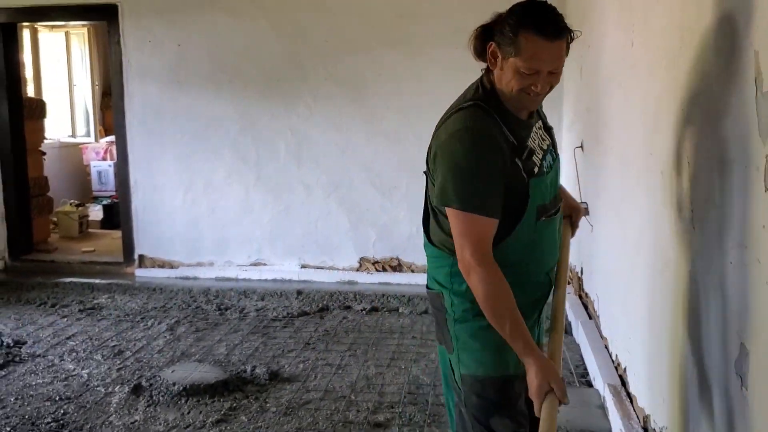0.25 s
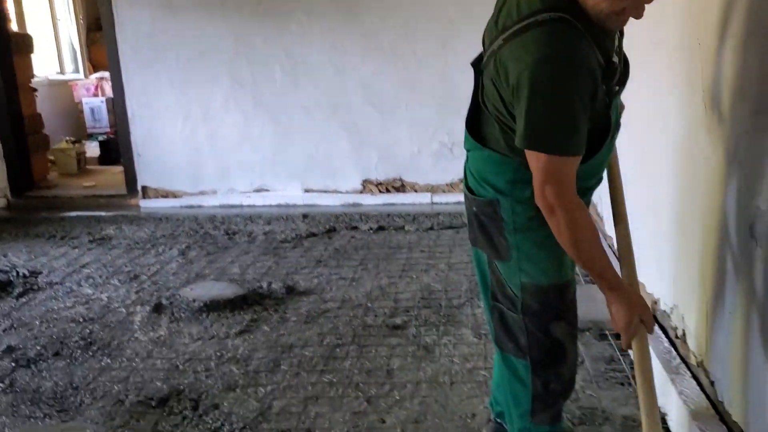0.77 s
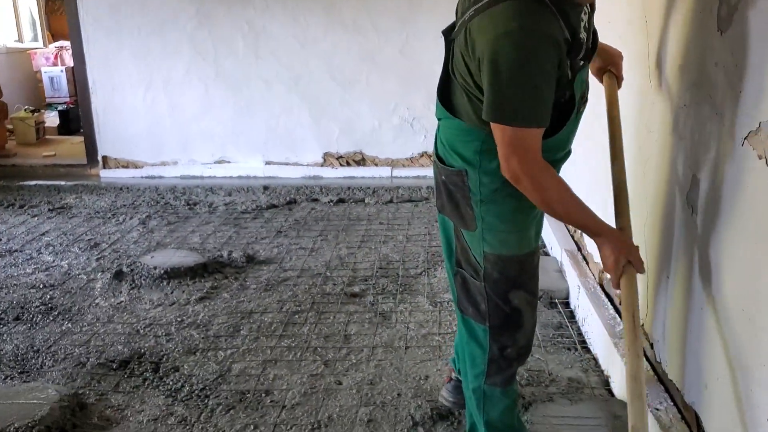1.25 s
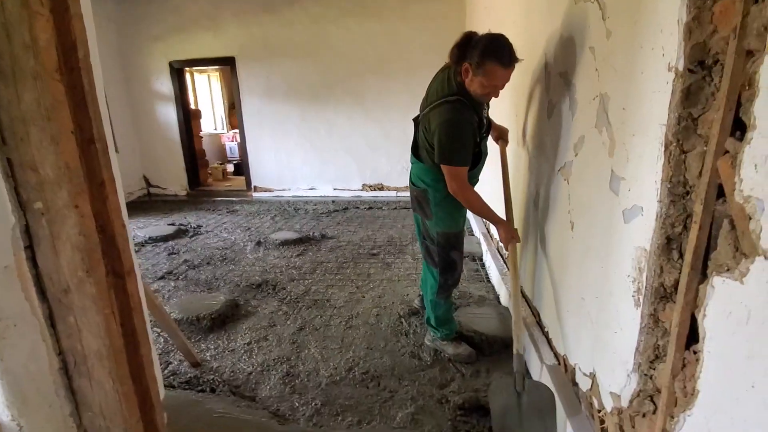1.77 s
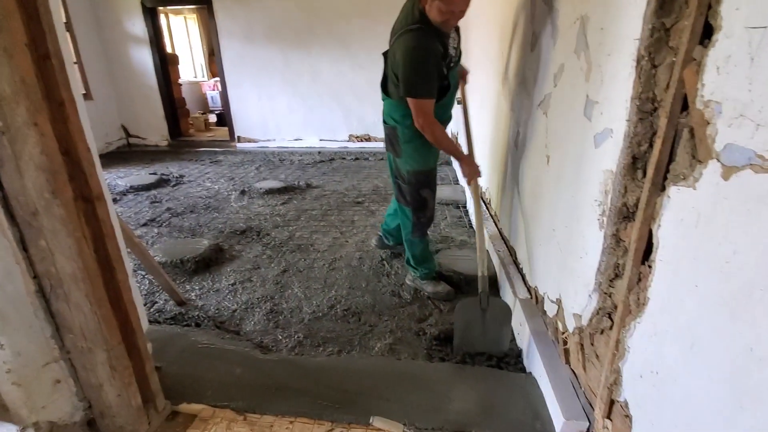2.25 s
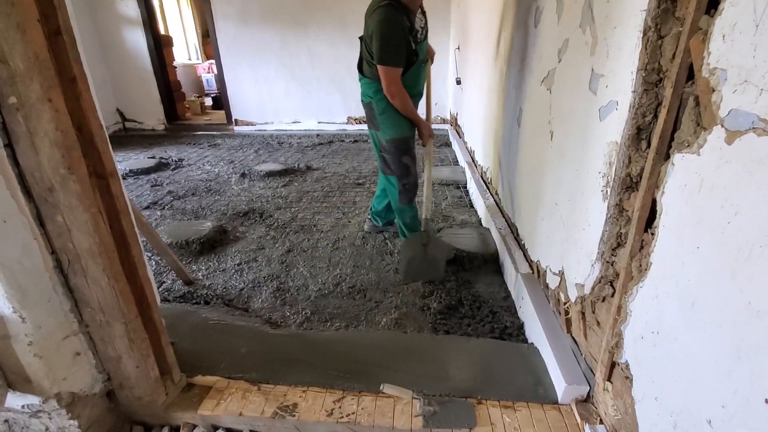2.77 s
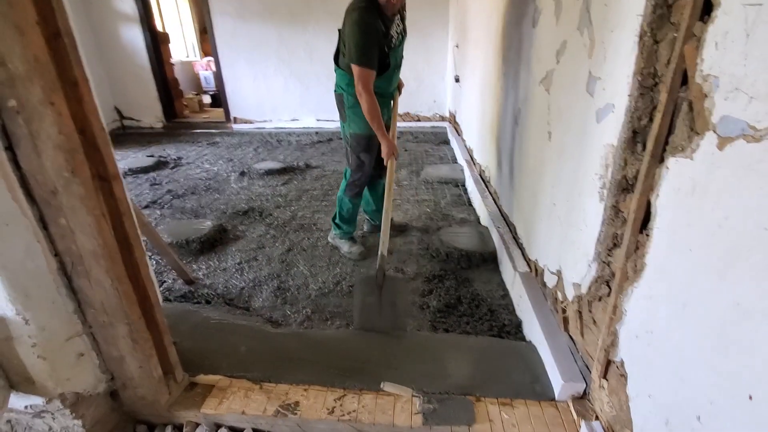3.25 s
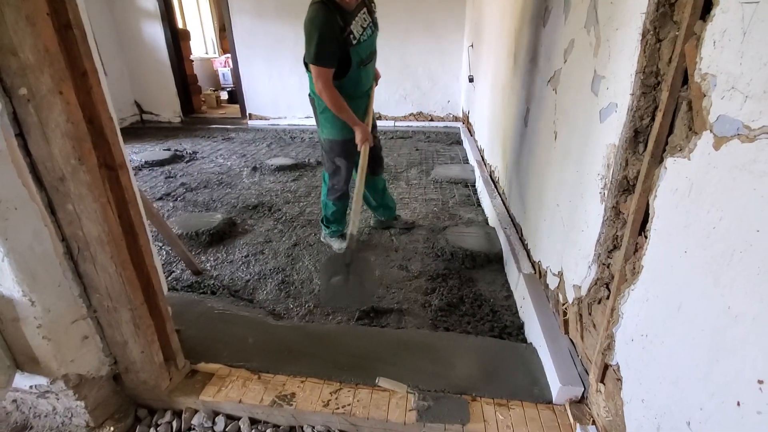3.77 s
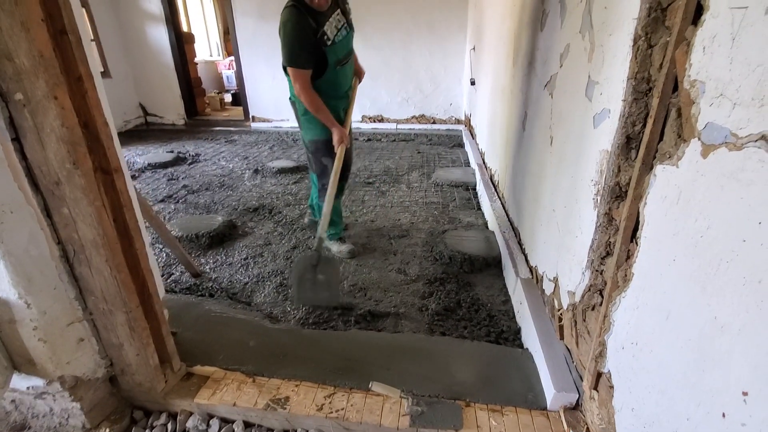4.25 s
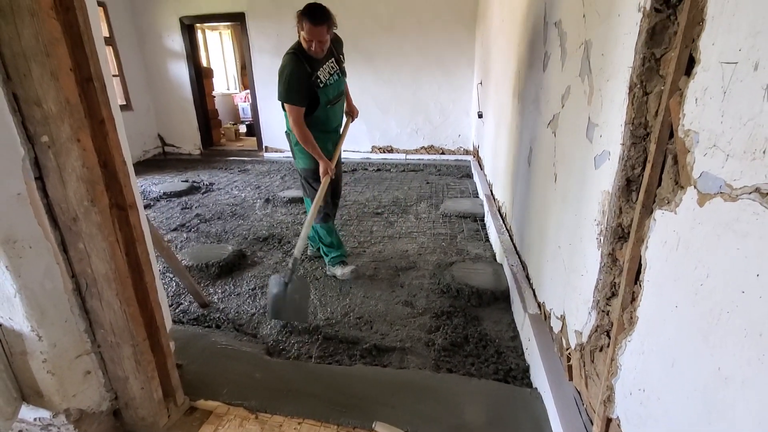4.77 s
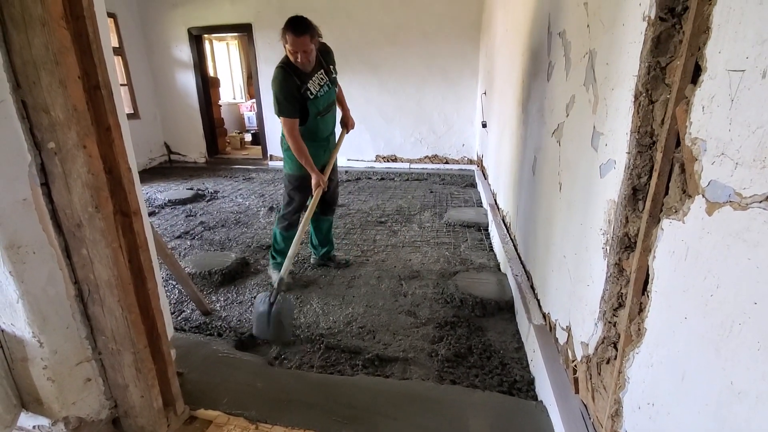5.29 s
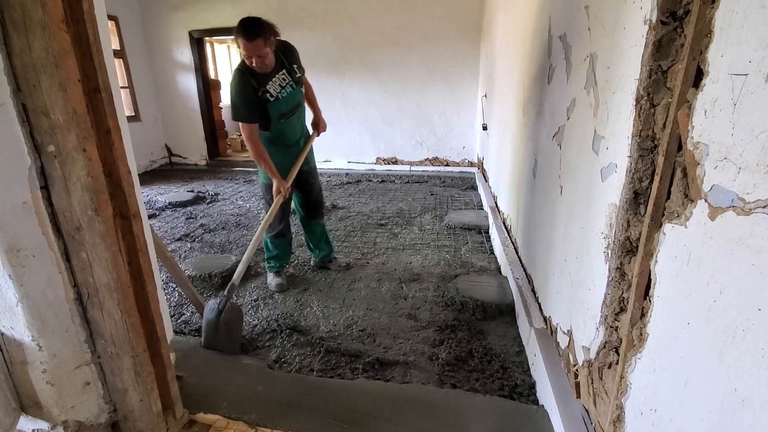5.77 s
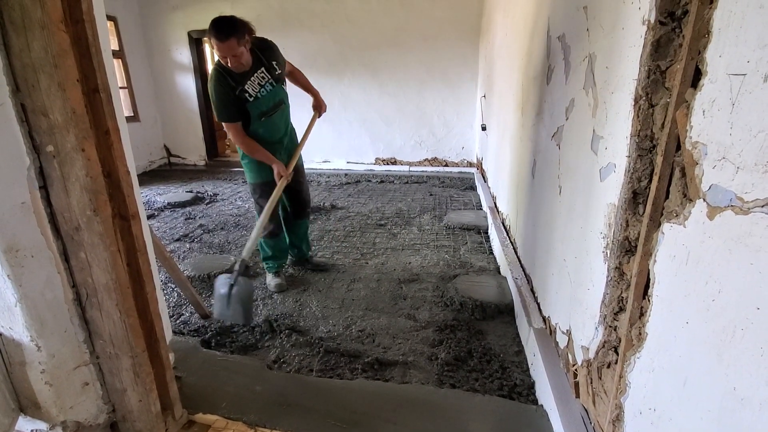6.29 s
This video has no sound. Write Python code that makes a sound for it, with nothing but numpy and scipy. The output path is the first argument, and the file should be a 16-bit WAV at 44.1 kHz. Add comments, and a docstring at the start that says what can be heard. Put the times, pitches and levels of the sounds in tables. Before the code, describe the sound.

Gritty shovel strokes crunch into wet concrete roughly every six tenths of a second, stones knocking the blade, while a distant motor hums low underneath.

```python
"""A steel shovel is jabbed into wet, stony concrete and dragged through it in a bare plastered room.
Bursts of shaped noise make the hissing sand, the rattling stones and the boom of the damped blade.
Short sine notes and clicks are the stones and pebbles that strike the steel.
A distant engine hums through the walls: two unsteady tones an octave apart on a bed of rumble.
Two small microphone ports with a treble resonance pick it up."""
import sys
import numpy as np
from scipy import signal
from scipy.fft import rfft, irfft, next_fast_len
from scipy.io import wavfile
from scipy.ndimage import map_coordinates

SR = 44100
rng = np.random.default_rng(int(sys.argv[2]) if len(sys.argv) > 2 else 0)


def wav_out(sig):
    """Save sig, one row per channel (or a flat mono array), as 16-bit PCM at SR to the path in sys.argv[1]."""
    wavfile.write(sys.argv[1], SR, np.round(np.clip(np.atleast_2d(sig).T, -1, 1) * 32767).astype(np.int16))


N = 287532

# The blade jabbed into the mix.
# Each row: contact in seconds, grit level in dB, build-up in seconds, push in seconds,
# sag of the grit in dB per second while pushed, blade boom and stone rattle in dB over the grit.
JAB_STROKES = [(0.065, -49, 0.0048, 0.077, 172, 7.5, 10.5), (.625, -23.5, 0.0017, 0.15, 92, -8.5, -5),
               (1.307, -22, 0.023, 0.14, 117, -9, -5.5), (1.805, -27, 0.036, .05, 164, -5, -5.5),
               (2.366, -25, .025, 0.11, 100, -6.5, -5), (3.262, -24.5, 0.0064, .04, 136, -22, -11.5),
               (3.864, -22.5, .01, 0.13, 79, -8.5, -4.5), (4.449, -19, 0.0013, 0.068, 67, -11, -7),
               (5.057, -24.5, 0.0028, 0.17, 30, -10.5, -9.5), (5.785, -28, .003, 0.15, 104, -8.5, -7.5),
               (6.498, -22, 0.0044, .05, 100, -27, -21)]


def amp(db):
    """Decibels to gain."""
    return 10 ** (np.asarray(db) / 20)


def unit(x):
    """x at rms 1."""
    return x / np.sqrt(np.mean(x ** 2) + 1e-20)


def along(points, hz):
    """Read a curve of (Hz, value) points on a log frequency axis."""
    f, v = np.transpose(points)
    return np.interp(np.log(hz + 1), np.log(f + 1), v)


def curves(rows):
    """One value per sample for each column after the time."""
    seconds, *columns = np.transpose(rows)
    return [np.interp(np.arange(N) / SR, seconds, column) for column in columns]


def wobble(rate):
    """A smooth random curve, rate knots a second."""
    knots = rng.standard_normal(int(N * rate / SR) + 4)
    return map_coordinates(knots, [np.arange(N) * rate / SR])


def filtered(x, response):
    """x times a complex response of frequency."""
    m = next_fast_len(N + SR // 2)
    return irfft(rfft(x, m) * response(np.fft.rfftfreq(m, 1 / SR)), m)[..., :N]


def shaped(x, points):
    """x coloured by a curve of (Hz, dB) points, then set to rms 1."""
    return unit(filtered(x, lambda hz: amp(along(points, hz))))


def modes(table):
    """The causal response of a few damped resonances, alternating in sign."""
    def response(hz):
        total = 0
        for k, (centre, width, db) in enumerate(table):
            damping = 1j * hz * width
            total = total + (-1) ** k * amp(db) * damping / (centre ** 2 - hz ** 2 + damping)
        return total
    return response


def ports(pair):
    """Two unrelated signals become left and right: alike in the bass, unrelated in the treble."""
    # Each row: frequency in Hz, left-right likeness from 0 to 1.
    likeness = [(60, 0.95), (290, 0.87), (640, 0.49), (900, 0.039), (1300, 0), (15000, 0.0014)]

    def split(hz):
        angle = np.arccos(np.clip(along(likeness, hz), -1, 1)) / 2
        return np.array([np.cos(angle), np.sin(angle)])
    mid, side = filtered(pair, split)
    return np.array([mid + side, mid - side])


def engine():
    """The firing tone and the shaft tone an octave below it, both unsteady, on a bed of rumble."""
    # How the firing tone drifts. Each row: time in seconds, pitch in Hz, level in dB.
    firing_drift = [(0.0, 122, -42), (0.11, 123, -39), (0.44, 125.5, -39), (0.51, 126.4, -62),
                    (0.74, 125.8, -41.5), (1.67, 125.3, -37.5), (2.14, 121.8, -42), (2.89, 126.1, -44),
                    (3.16, 123.5, -46.5), (3.36, 126.6, -37.5), (3.67, 128.1, -44.5), (3.74, 124.7, -36.5),
                    (4.36, 117.7, -44.5), (4.45, 126, -35), (4.52, 128.2, -55), (4.7, 124.3, -47),
                    (5.63, 123.5, -39), (5.79, 125, -60), (5.87, 124, -41), (6.52, 118.6, -48.5)]
    # Spectrum of the rumble. Each row: frequency in Hz, density in dB per Hz.
    rumble_colour = [(20, -36), (35, -4), (60, -26), (100, 2.5), (170, -7.5), (260, -8), (600, -18),
                     (1000, -22), (3000, -33.5), (7000, -33), (11500, -37.5), (15000, -42)]
    firing_hz, firing_db = curves(firing_drift)
    shaft_db = -48 - 0.65 * np.arange(N) / SR  # fades 0.65 dB a second
    turn = np.pi * np.cumsum(firing_hz) / SR  # shaft phase, half the firing phase
    firing = np.sqrt(2) * amp(firing_db + 1.97 * wobble(25)) * np.sin(2 * turn + 0.4 * wobble(11))
    shaft = np.sqrt(2) * amp(shaft_db + 2.5 * wobble(18)) * np.sin(turn + 0.44 * wobble(7.7))
    tones = firing + shaft
    # the scaled slope added left and taken off right: the hum reaches one port a little earlier
    slope = np.gradient(tones) * SR / (2 * np.pi * firing_hz)
    hum = tones * [[1], [1]] + 0.18 * slope * [[1], [-1]]
    bed = shaped(rng.standard_normal((2, N)), rumble_colour)
    return hum + amp(-50.5 + 2.3 * wobble(2.904)) * ports(bed)


def effort(over_grit, linger, settle_db):
    """Level in dB of one layer: jabs start at once, drags swell within their stroke, powers add."""
    # The blade dragged or tipped through the mix.
    # Each row: peak in seconds, grit level in dB, swell in dB per second, hold in seconds,
    # blade boom and stone rattle in dB over the grit.
    drag_strokes = [(.03, -60, 50, .03, 2, -2), (.2, -68, 50, .05, 14, -8),
                    (0.349, -45.5, 172, 0.065, 4, 2), (0.493, -55.5, 100, 0.12, 4, 5),
                    (0.81, -38.5, 55, 0.042, -1, -1), (0.906, -29.5, 124, .005, -12, -4.5),
                    (1.029, -42, 150, 0.0071, 2.5, -0.5), (1.08, -52.5, 102, 0.039, 8, 7.5),
                    (1.231, -50, 207, 0.015, 7, 3.5), (1.509, -37, 100, 0.011, -4, -3),
                    (1.961, -23, 134, 0.031, -10, -16.5), (2.324, -56.5, 100, 0.078, 8, 7.5),
                    (2.639, -37, 58, 0.0048, -10, -1), (2.845, -63.5, 50, 0.043, 7, 4),
                    (2.973, -59, 41, 0.0046, -13, -14), (3.34, -28.5, 98, .005, -5, -3),
                    (3.432, -30, 302, .005, -3.5, -7), (3.746, -62, 51, 0.017, 7.5, 9.5),
                    (4.079, -31, 300, .015, -7, -1.5), (4.324, -45.5, 400, 0.05, -3, -2.5),
                    (4.533, -23, 148, 0.0038, -3.5, -2.5), (4.627, -25, 200, 0.0033, -3.5, -6),
                    (4.926, -65, 200, 0.027, -7, 2), (5.259, -37, 98, 0.0052, -2, -1),
                    (5.381, -38, 50, 0.012, 1, -2.5), (5.67, -69, 48, 0.028, -13, -1),
                    (5.996, -31, 93, 0.047, -5, -5), (6.37, -49, 161, 0.044, -3, -1)]
    build_up, release = 276, 143.7  # dB per second; linger scales the release
    contact_s = 0.003  # fade-in that ends at the contact
    t = np.arange(0, N / SR + .01, 1 / 1000)
    power = np.full(len(t), amp(2 * settle_db))
    for row in JAB_STROKES:
        start, db, build, push, sag = row[:5]
        since = t - start
        rise_db = -build_up * np.clip(build - since, 0, build)
        sag_db = sag * np.clip(since - build, 0, push)
        release_db = release * np.maximum(since - build - push, 0)
        level_db = db + over_grit(row) + rise_db - linger * (sag_db + release_db)
        power += amp(2 * level_db) * np.clip(1 + since / contact_s, 0, 1) ** 2
    for row in drag_strokes:
        peak, db, swell, hold = row[:4]
        rise_db = swell * np.minimum(t - peak, 0)
        release_db = release * linger * np.maximum(t - peak - hold, 0)
        # a drag cannot be heard ahead of the last jab before its peak
        contact = max([jab[0] for jab in JAB_STROKES if jab[0] < peak], default=0)
        power += amp(2 * (db + over_grit(row) + rise_db - release_db)) * (t >= contact)
    return np.interp(np.arange(N) / SR, t, 10 * np.log10(power))


def strokes():
    """Levels of grit, boom and rattle; boom and rattle die more slowly than the grit."""
    # The mix settling between strokes, a steady floor in dB: grit, boom, rattle.
    settle_floor = (-76, -63, -64)
    grit_db = effort(lambda row: 0, 1, settle_floor[0])
    boom_db = effort(lambda row: row[-2], 0.92, settle_floor[1])
    rattle_db = effort(lambda row: row[-1], 0.94, settle_floor[2])
    return grit_db, boom_db, rattle_db


def grains(rate, spread_db, life, smooth):
    """Two noise streams in short bursts of unequal size (life in s), over a share of smooth noise."""
    starts = rng.random(N) < rate / SR
    size = starts * amp(spread_db * np.minimum(rng.exponential(1, N), 3.5))
    bursts = signal.lfilter([1], [1, -np.exp(-1 / (life * SR))], size)
    return (unit(bursts) + smooth) * rng.standard_normal((2, N))


def pebbles(rate, life):
    """Rolling pebbles: brief damped notes of scattered pitch and size, other phases in each stream."""
    at, pitch, size, *phases = rng.random((int(rate * N / SR), 5)).T
    t = np.arange(176) / SR
    hz = 900 * (6500 / 900) ** pitch[:, None]  # 900 to 6500 Hz
    shape = amp(9.4 * size[:, None] ** 2) * np.exp(-t / life) * (1 - np.exp(-t / 0.00042))
    where = ((at * N).astype(int)[:, None] + np.arange(176)).ravel()
    streams = []
    for phase in phases:
        notes = shape * np.sin(2 * np.pi * (hz * t + phase[:, None]))
        streams.append(np.bincount(where, notes.ravel())[:N])
    return unit(np.array(streams))


def shovel():
    """Sand, stones, blade and wet mix all follow the stroke and share its judder."""
    # Spectra of hissing sand, rasping stones and the heavy wet mix moving.
    # Each row: frequency in Hz, density in dB per Hz.
    sand_colour = [(4500, -7.5), (6000, -7.5), (7400, -9.5), (9500, -3.5), (13500, -8.5), (15600, -7),
                   (20000, -7)]
    stone_colour = [(900, -22.5), (1200, -4.5), (1800, 3), (2800, -1), (4700, -3), (6000, -9), (7500, -46)]
    slop_colour = [(70, -19), (110, 6.5), (200, -11.5), (305, 2.5), (370, -2.5), (500, -52.5)]
    # Low modes of the blade. Each row: frequency in Hz, width in Hz, level in dB.
    blade_modes = [(431.5, 124, -2), (538.7, 69.4, 3.5), (648, 54, -1), (943, 274, -10)]

    def blade(hz):
        return modes(blade_modes)(hz) * hz ** 2 / (hz ** 2 + 400 ** 2)  # thinned below 400 Hz
    grit_db, boom_db, rattle_db = strokes()
    judder_db = 1.6 * wobble(35)
    sand = shaped(grains(400, spread_db=2.5, life=0.003, smooth=1.9), sand_colour)
    rasp = shaped(grains(500, spread_db=3, life=.0025, smooth=1.6), stone_colour)
    stones = unit(rasp + 0.84 * pebbles(800, life=0.00079))
    boom = unit(filtered(grains(120, spread_db=-1, life=0.01, smooth=0.91), blade))
    slop = shaped(rng.standard_normal((2, N)), slop_colour)
    body = boom + amp(-8.0 + 0.91 * wobble(6)) * slop
    return amp(judder_db) * (amp(grit_db) * sand + amp(rattle_db) * stones + amp(boom_db) * body)


def knocks():
    """Large stones give short damped notes; pebbles and the bite of a jab give a click and a low push."""
    # Pebbles clicking on bare steel.
    # Each row: start in seconds, click level in dB, thump level in dB, top of the click in Hz.
    pebble_clicks = [(0.0647, -35, -23, 12000), (0.076, -20, -32, 6000), (1.157, -24.5, -25, 5000),
                     (1.203, -28, -29, 1500), (1.672, -32, -36, 1202), (1.69, -27, -34, 1230),
                     (1.98, -18, -31, 15000), (1.9995, -22, -34, 15000), (2.0154, -10.5, -27, 10000),
                     (2.0209, -16.5, -29, 15000), (2.319, -38, -26, 3000), (4.5445, -18, -35, 8000)]
    # Stones knocking the blade. Each row: start in seconds, level in dB, pitch in Hz.
    stone_knocks = [(.625, -14, 1260), (.669, -14.5, 562), (.873, -18.5, 447), (.903, -13.5, 523),
                    (.928, -21, 550), (1.058, -18, 1690), (1.309, -21, 1260), (1.335, -17.5, 516),
                    (1.5, -19, 600), (1.832, -18, 503), (1.919, -13.5, 466.5), (1.944, -11.5, 550),
                    (2.409, -10.5, 553), (2.474, -14, 434), (3.095, -39, 1550), (3.184, -37, 1430),
                    (3.326, -14.5, 740), (3.428, -18, 850), (4.449, -6, 578), (4.536, -3, 873),
                    (4.623, -4, 672), (5.382, -20, 565), (5.786, -15, 564), (6.049, -17, 535.5)]
    out = np.zeros((2, N + SR))
    t = np.arange(SR // 4) / SR
    # a jab bites with a click 0.5 dB and a push 28 dB under its grit
    bites = [(start, db - 0.5, db - 28, 14100) for start, db, *_ in JAB_STROKES]
    for start, click_db, thump_db, top_hz in [*pebble_clicks, *bites]:
        click = amp(click_db - 60 * t / 0.0093) * rng.standard_normal((2, len(t)))
        click = signal.lfilter(*signal.butter(2, top_hz, fs=SR), click)
        thump = amp(thump_db - 60 * t / 0.019) * np.sin(2 * np.pi * 190 * t) * [[1], [.2]]
        out[:, round(start * SR):][:, :len(t)] += click + thump
    for start, db, hz in stone_knocks:
        scuff = np.cumsum(rng.standard_normal(len(t))) * hz / 20000  # rough contact blurs the pitch
        envelope = amp(-60 * t / 0.047) * (1 - np.exp(-t / 0.006))  # falls 60 dB in 47 ms
        note = np.sin(2 * np.pi * hz * t + scuff) * envelope
        out[:, round(start * SR):][:, :len(t)] += amp(db) * note * [[1], [.3]]
    return out[:, :N]


def room(x, wet_db):
    """The direct sound, then a diffuse wall tail, drawn afresh every fifth of a second."""
    # Decay of the bare room. Each row: frequency in Hz, time to fall 60 dB in seconds.
    decay_times = [(200, 0.36), (1000, 0.52), (4000, 0.57), (12000, 0.18)]
    out = np.pad(x, ((0, 0), (0, SR)))
    piece = SR // 5
    for start in range(0, N, piece):
        hz, t, z = signal.stft(rng.standard_normal((2, SR * 2 // 3)), SR, nperseg=256)
        decay = amp(-60 * t / along(decay_times, hz)[:, None])
        tail = signal.istft(z * decay, SR, nperseg=256)[1]
        heard = signal.fftconvolve(x[:, start:start + piece], tail / np.linalg.norm(tail[0]), axes=1)
        out[:, start + 130:][:, :heard.shape[1]] += amp(wet_db) * heard  # walls 130 samples later
    return out[:, :N] / np.hypot(1, amp(wet_db))  # direct and wall energy add up to 1


def scene():
    """The shovel in its room, over the hum."""
    return ports(room(shovel() + knocks(), wet_db=-6.5)) + engine()


def record(dry):
    """Port resonance, unequal ports, a bass cut, a treble drop and the band limit."""
    # Resonance of the microphone ports: frequency in Hz, width in Hz, level in dB.
    port_mode = (11890, 1070, 8)
    # Imbalance of the ports. Each row: frequency in Hz, left minus right in dB.
    port_lean = [(60, -1.5), (150, -4), (380, 0), (950, -1.5), (2380, 1.5), (5980, -3.5), (15000, -4)]
    drop_hz, top_hz = 15800, 17038

    def response(hz):
        """One response per port."""
        bass_cut = hz / (hz - 40j)  # corner at 40 Hz
        treble_drop = np.where(hz < drop_hz, 1, amp(-44))
        colour = (1 + modes([port_mode])(hz)) * bass_cut * treble_drop
        lean_db = along(port_lean, hz) / 2
        return colour * amp([lean_db, -lean_db]) * (hz < top_hz)
    return filtered(dry, response)


dry = scene()
out = record(dry)
wav_out(out)
```